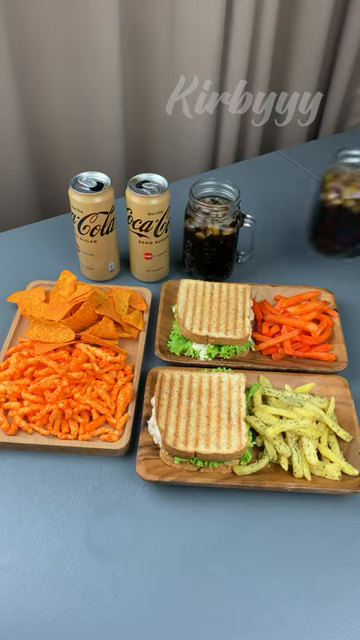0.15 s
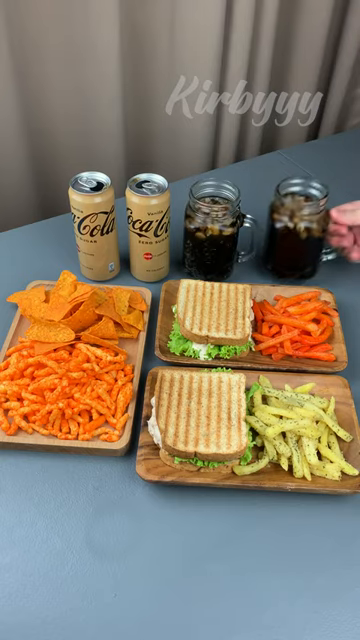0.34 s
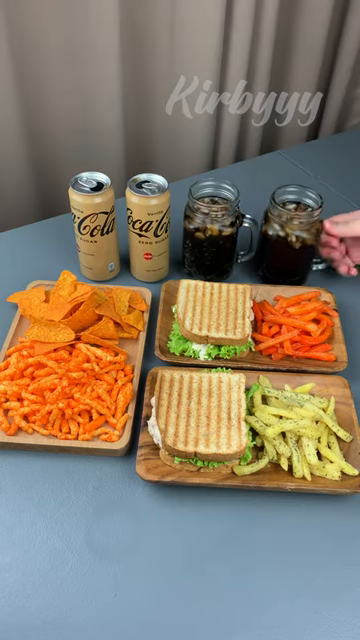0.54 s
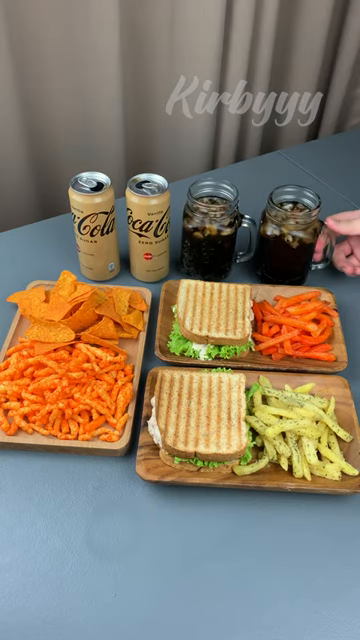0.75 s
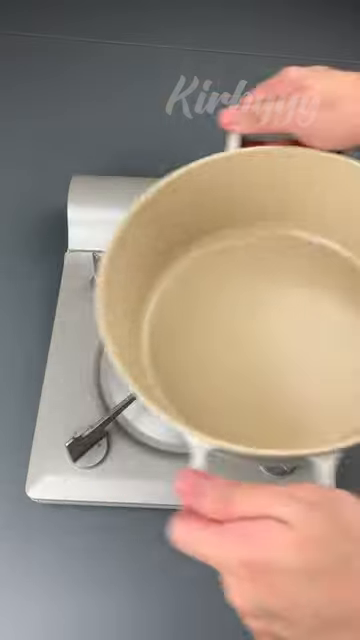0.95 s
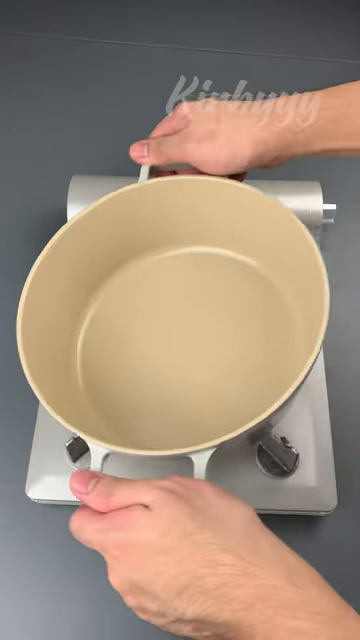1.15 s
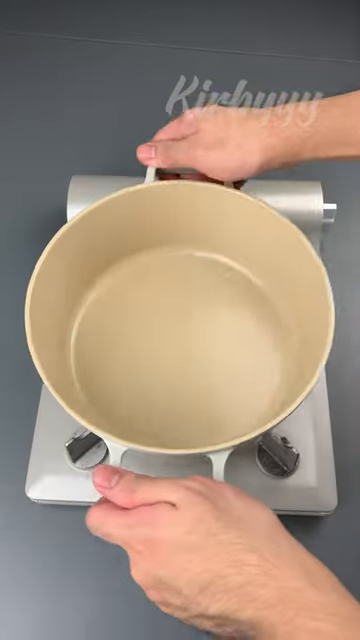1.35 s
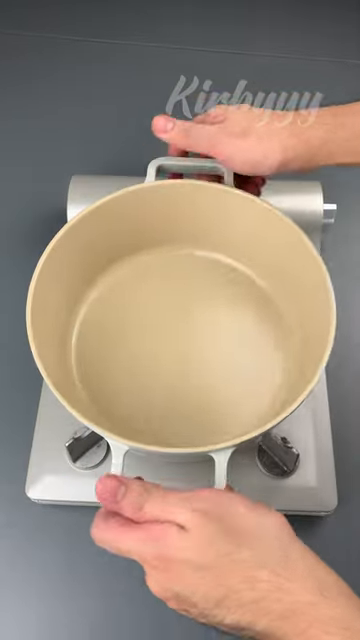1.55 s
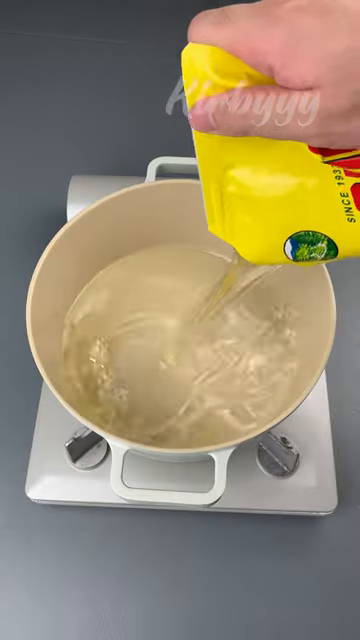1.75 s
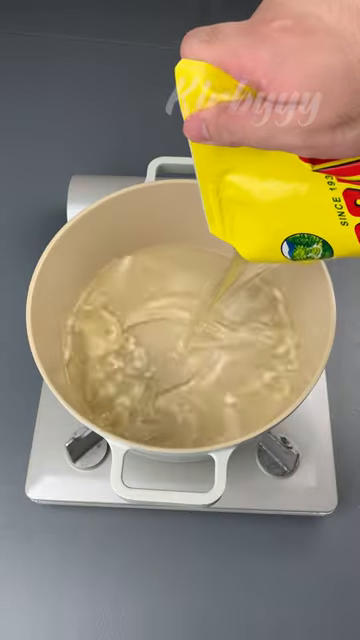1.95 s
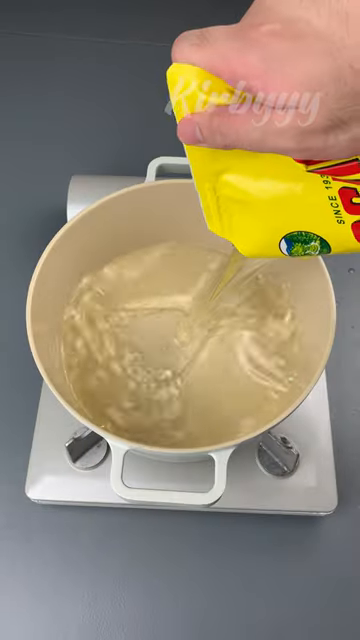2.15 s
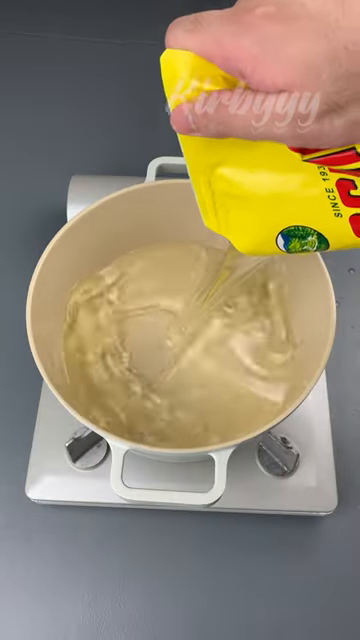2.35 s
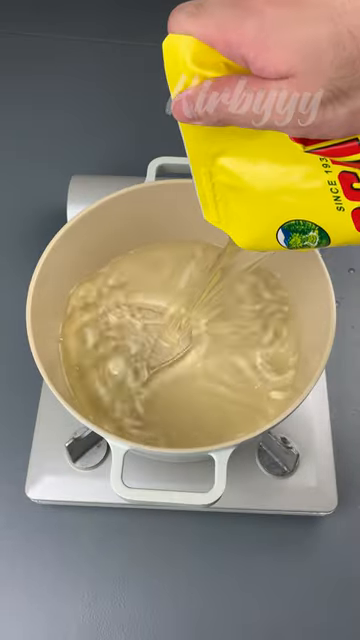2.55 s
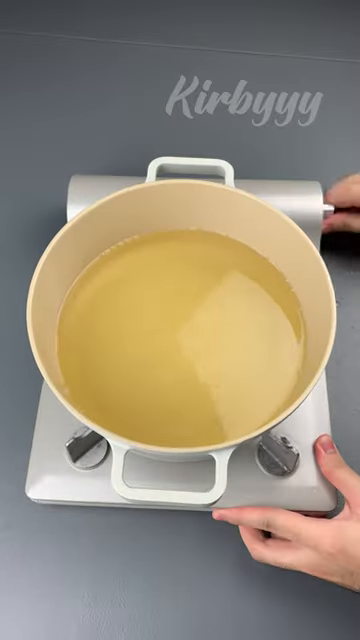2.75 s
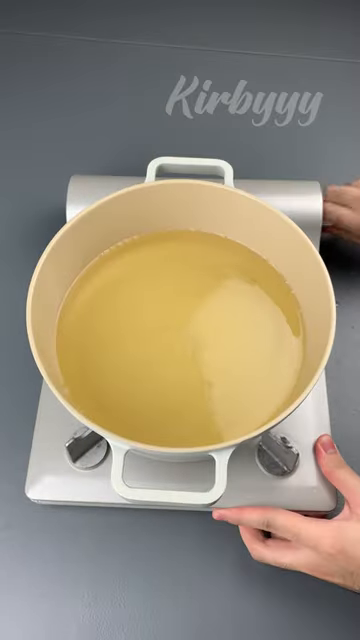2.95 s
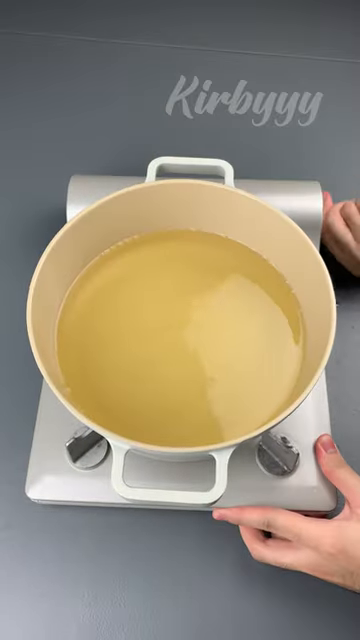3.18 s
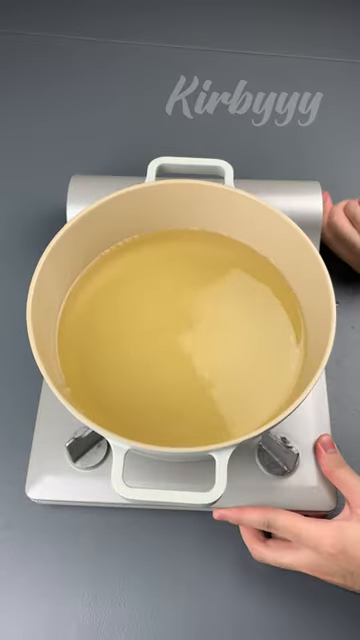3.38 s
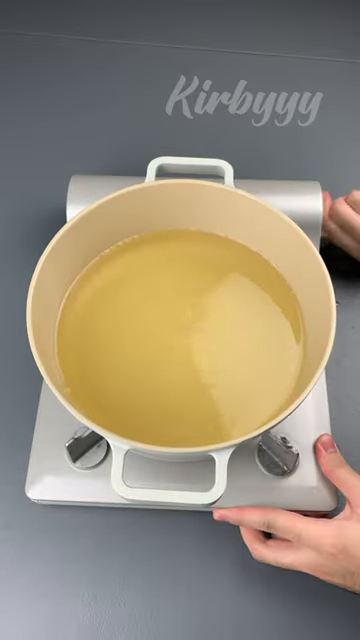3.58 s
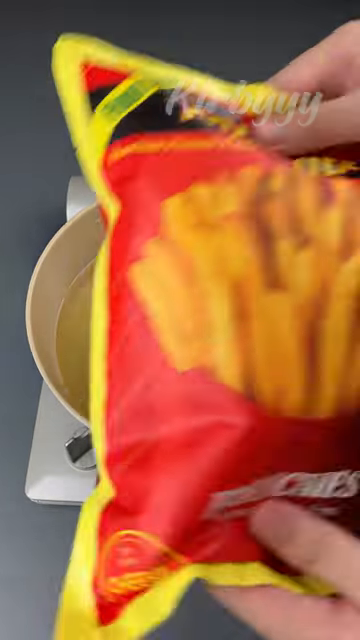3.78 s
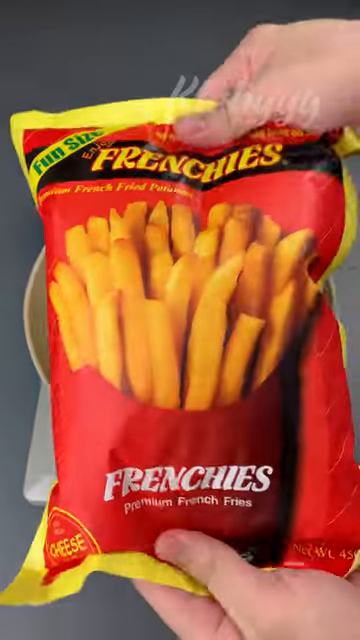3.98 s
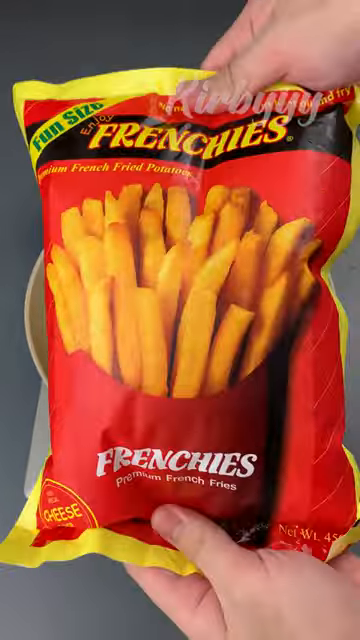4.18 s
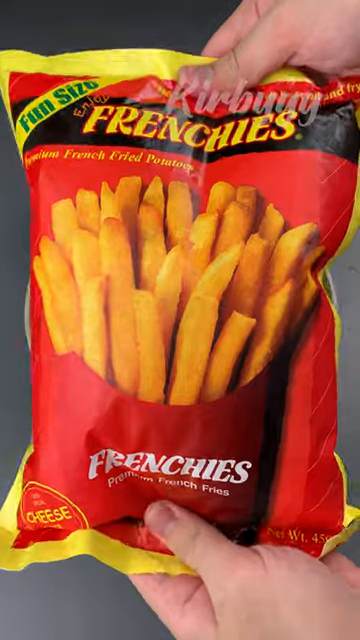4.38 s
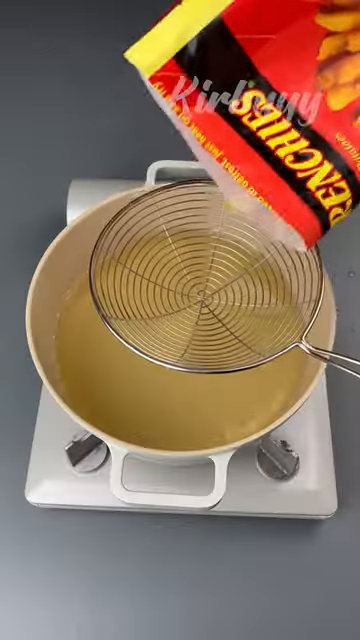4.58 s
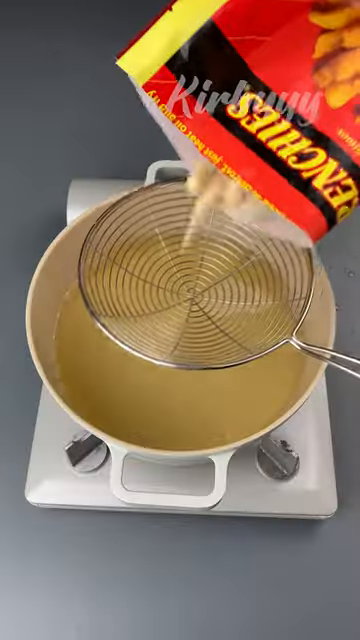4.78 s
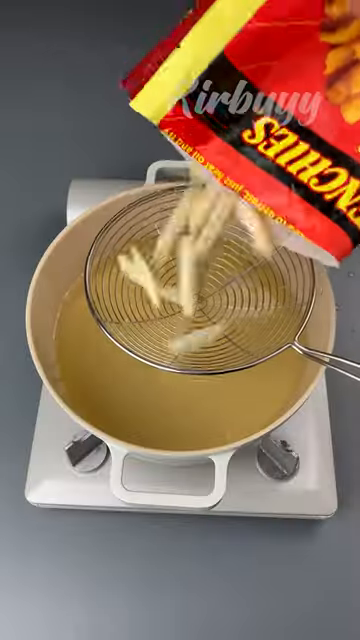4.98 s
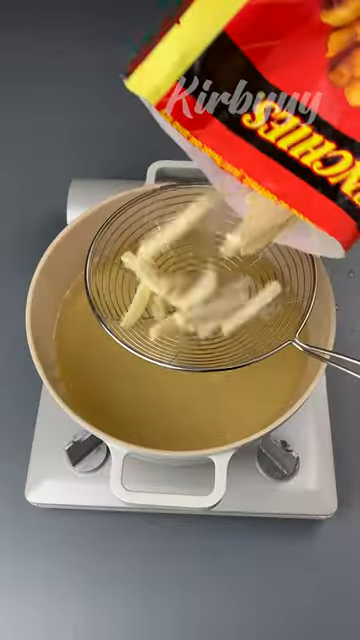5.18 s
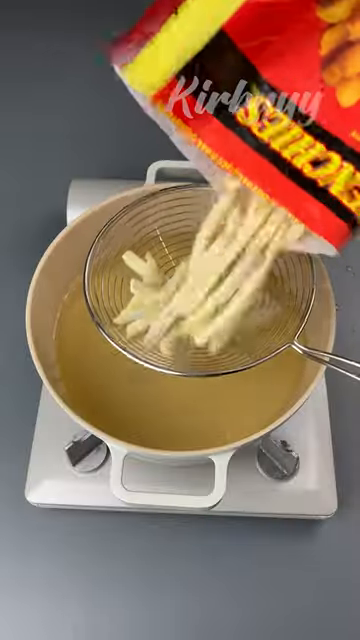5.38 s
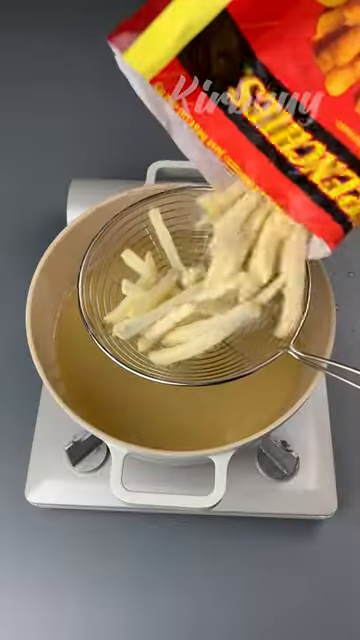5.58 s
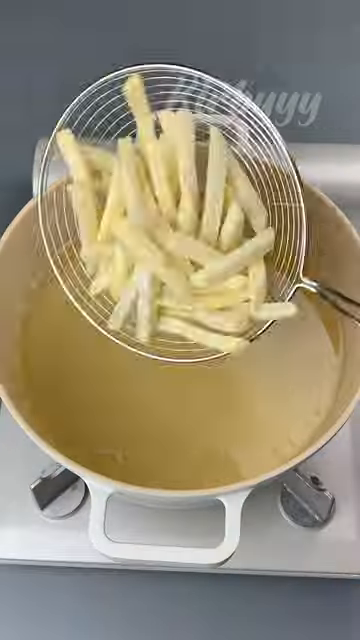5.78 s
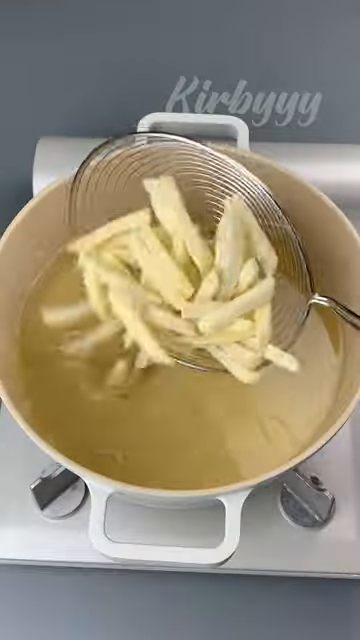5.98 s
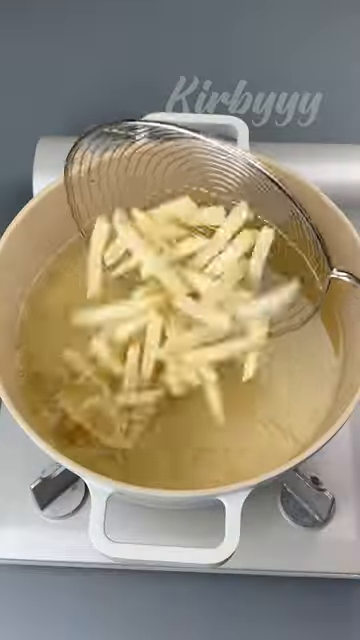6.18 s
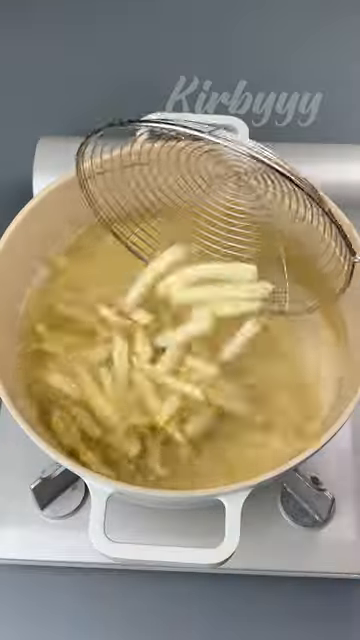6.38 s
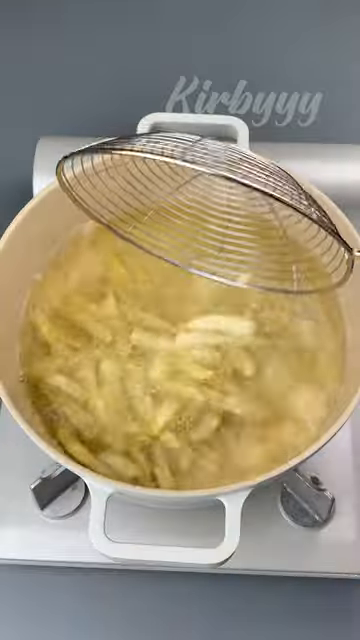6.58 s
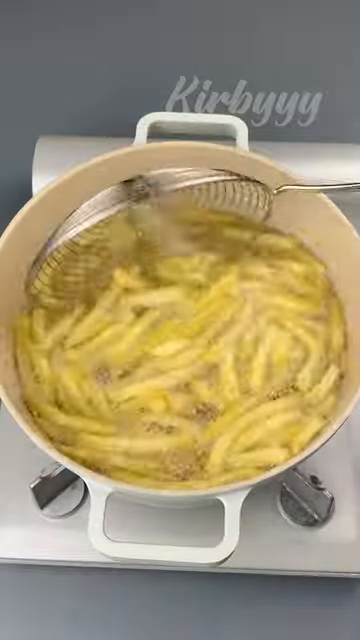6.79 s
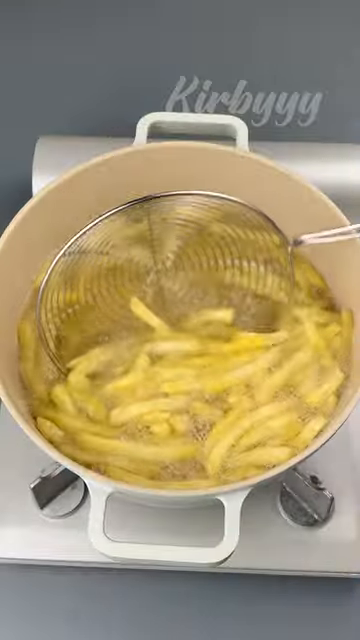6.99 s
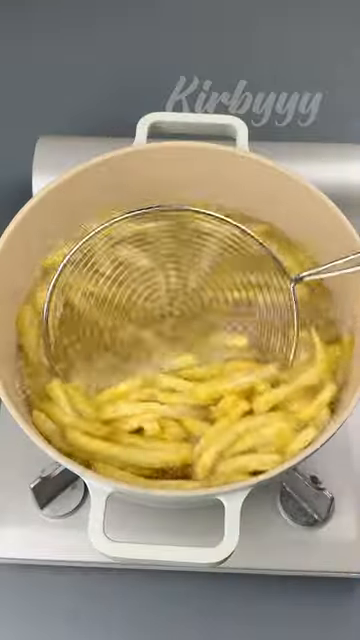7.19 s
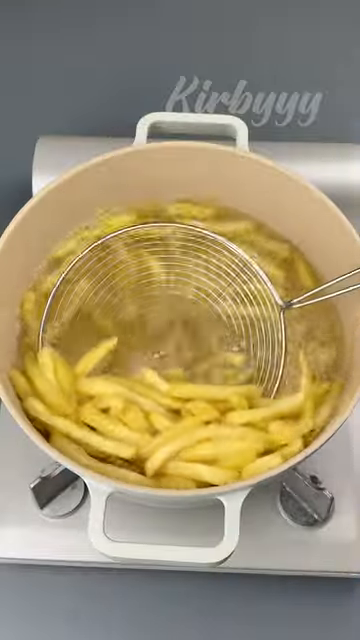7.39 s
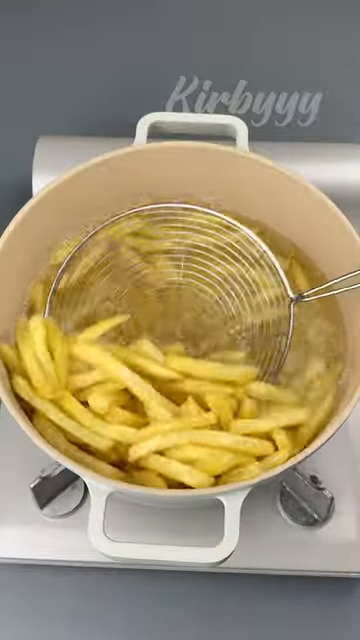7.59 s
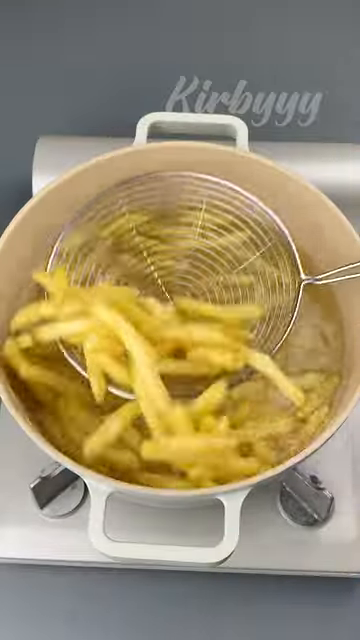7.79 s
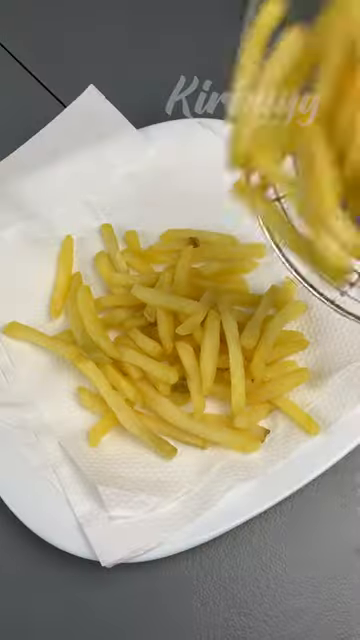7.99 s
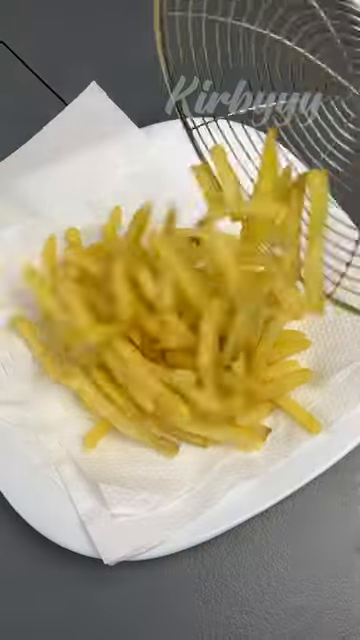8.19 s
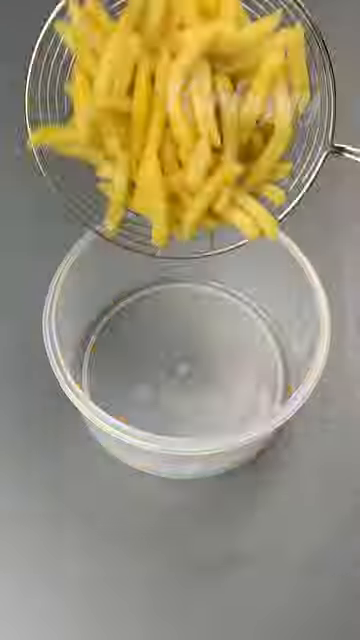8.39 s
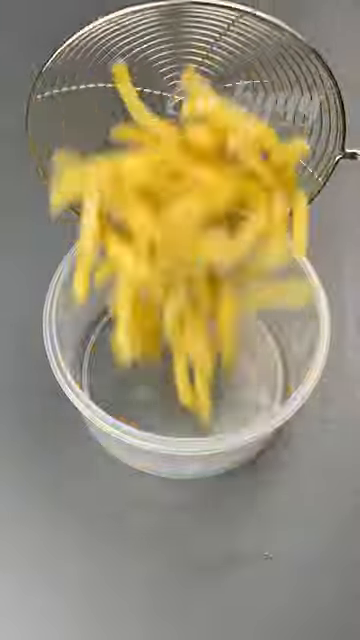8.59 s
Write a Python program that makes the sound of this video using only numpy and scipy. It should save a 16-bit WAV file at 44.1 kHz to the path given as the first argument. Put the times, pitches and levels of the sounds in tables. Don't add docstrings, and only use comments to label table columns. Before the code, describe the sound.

Close, abruptly cut cooking sounds: table knock, metal clank, splashing oil, gas burner snap, crinkling frozen bag, spilling fries, wet sizzling, plate rustle, plastic drumming.

```python
import sys
import numpy as np
from scipy import signal
from scipy.fft import rfft, irfft, next_fast_len
from scipy.io import wavfile
from scipy.ndimage import uniform_filter1d

SR = 44100
rng = np.random.default_rng(int(sys.argv[2]) if len(sys.argv) > 2 else 0)


def undo_db(level):
    steps = np.asarray(level, float) / 20
    return 10 ** steps


def generate_wav(sig):
    pcm = np.round(np.clip(np.atleast_2d(sig).T, -1, 1) * 32767).astype(np.int16)
    wavfile.write(sys.argv[1], SR, pcm)


N = 381024

CUTS = [
    0,
    .837,
    1.637,
    3.7,
    4.542,
    5.842,
    6.712,
    7.874,
    8.445,
    8.7,
]
ALIKE = [.6, .4, .5, .3, .9, 1., 1., 1., .9]

# [t/s, level/dB]
QUIET = [
    [(.2, -76), (.27, -57), (.4, -77)],
    [(.84, -87), (1.08, -93), (1.14, -54)],
]
OIL = [(1.64, -54), (1.76, -51.5), (2.0, -75), (2.24, -70), (2.32, -57), (2.55, -51.5), (2.82, -72),
       (2.95, -59), (3.16, -55)]
FLAME = [(3.21, -28), (3.3, -32), (3.5, -58), (3.698, -75.5)]
BAG = [
    [(3.7, -41), (3.76, -26), (3.95, -35.5), (4.04, -29), (4.13, -54.5), (4.22, -37), (4.28, -49.5),
     (4.4, -44.5), (4.54, -37)],
    [(4.545, -55.5), (4.59, -43.5), (4.68, -29), (4.74, -37.5), (4.88, -33.5)],
]
POUR = [(4.88, -24), (4.97, -17.5), (5.14, -23.5), (5.36, -25), (5.45, -33.5), (5.53, -23), (5.77, -33),
        (5.84, -30)]
SIZZLE = [(5.845, -55.5), (5.93, -37), (6.08, -19), (6.15, -24.5), (6.31, -17.5), (6.4, -22.5), (6.66, -25),
          (6.71, -32)]
FRY = [(6.715, -38.5), (7.872, -35)]
SLIDE = [
    [(7.876, -50), (7.98, -35), (8.12, -21.5), (8.22, -23), (8.36, -38.5), (8.443, -47)],
    [(8.447, -34), (8.5, -31.5), (8.58, -35)],
]

COLOUR_HZ = [50, 110, 250, 500, 1000, 2000, 4500, 9000, 15500]
HUM = [-7, -1.5, -13, -19.5, -14, -10, -21, -31, -28]
KNOCK = [-25, -5.5, -11.5, -7, -14, -15.5, -15, -31, -33]
CLANK = [-4, 4.5, -10, -9, -5.5, -13, -4, -19, -30.5]
SPLASH = [-14, -11, -11.5, -1.5, 5, 3, 5, -1.5, -2]
TICK = [-40, -40, -35, -30, -25, -18, -10, -4, 0]
SNAP = [-20, 4.5, -11.5, 1.5, -1, -6, -10, -17, -22]
ROAR = [-12.5, -6.5, -1, 7.5, -5, -10, -30.5, -42, -49]
FILM = [-13, -9, -7.5, -2.5, 4, -5, -2.5, -3.5, -5]
HISS = [-6, -7, -18.5, -7, -5, -10.5, -6, -2, -2]
RUSTLE = [5, 7, -5, -12, -8, -11.5, -26.5, -26.5, -28.5]
DRUM = [-21, -5.5, 6, -16.5, -11.5, -10, -13, -25, -31.5]

# [t/s, level/dB; where they vary: treble share/dB, crack length/ms]
JAR_BLOWS = [
    (0.228, -49.5, -6),
    (0.268, -48.5, -9.5),
    (0.304, -51.5, -9),
    (0.415, -0.5, -23),
    (0.427, 1, -24.5),
    (0.552, -13, -11),
]
POT_BLOWS = [
    (1.165, -1, -22, 5.8),
    (1.173, -3, -26, 8),
    (1.184, -3, -28.5, 8),
    (1.198, -7, -26, 8),
    (1.224, -15, -26, 8),
    (1.284, -16, -32.5, 8),
    (1.376, -1, -17, 10),
    (1.388, -6, -22, 10),
    (1.409, -11, -22, 10),
]
OIL_SLAPS = [(1.678, -35, 7.5), (1.721, -21, -10.5), (1.752, -23, -21.5), (1.796, -21, -16),
             (1.888, -29.5, -8), (1.927, -23, -3), (1.947, -23.5, -69), (2.022, -37, 0, 16),
             (2.054, -20.5, -37), (2.158, -37, -36), (2.277, -12, -33), (2.483, -2, -27),
             (2.573, -16.5, -6), (2.599, -16, -10), (2.659, -20, -33.5), (2.74, -25, -28.5)]
LEVER = [
    (2.896, -19.5, -11.5),
    (3.056, -17.5, -28),
    (3.177, 7, -14.5),
    (3.51, -16, -22.5),
]
CREASES = [(3.712, -8, -16), (3.7192, -2), (3.73, 0.98, -10.5), (3.7519, 3, 0), (3.7732, -2),
           (3.8126, -1.8, -17.5), (3.832, -2, -17.5), (3.8878, -4.5, -26), (3.9003, 0), (3.9377, -8),
           (3.955, -15, -6), (3.9893, 2), (4.0135, 0.98), (4.0214, 0), (4.05, -7), (4.0565, 2),
           (4.0834, -1), (4.1071, -8), (4.1663, -3.5), (4.137, -16, -14), (4.148, -16, -10),
           (4.182, -2, -14), (4.2, -6, -12), (4.2268, -3), (4.3185, -5.5), (4.289, -15, -10),
           (4.332, -7, -10), (4.409, -16, -12), (4.438, -13, -12), (4.3468, -15.5, -2.5), (4.368, -2.8),
           (4.3831, 2.5), (4.4483, -9.5, -16.5), (4.4772, -4), (4.5081, -4, 1)]
TUMBLES = [(4.5293, 5, -6), (4.6029, 1, -12), (4.651, 1.5, -8), (4.664, -4, -14, 16), (4.7002, -7, -0.5),
           (4.7584, -1.5, -12), (4.886, -14, -3.5), (4.945, -6.5, 4), (5.0482, -6, -20),
           (5.1064, -11.5, -3), (5.1723, -9, -0.5), (5.2078, -2, -15.5), (5.2924, -6, -22),
           (5.314, -5, -20), (5.3749, -5, -15), (5.3917, -4, -16), (5.409, -6, -13), (5.5174, -5, -5),
           (5.528, -5, -18)]
SPITS = [(6.0717, 2, -1.5), (6.115, -9, -15), (6.5705, -13, -14), (6.6194, -9, -5), (6.6664, -16.5, -18.5),
         (7.852, -12.5, -4.5)]
SIEVE_KNOCKS = [(6.016, -22.5), (6.061, -16), (6.116, -14.5), (6.175, -12.5), (6.224, -14), (6.262, -21),
                (6.305, -4.5), (6.339, -15.5), (6.373, -15), (6.46, -14), (6.525, -21.5)]
SIEVE_BLOW = [
    (6.861, 2.5, -18),
    (6.882, -15, -8.5),
]
PLATE_BLOW = [
    (8.296, -3, -10.0),
]
TUB_BLOWS = [
    (8.585, 11, -25.5),
    (8.613, 4.5, -37.5),
    (8.618, -6.5, -28.5),
    (8.626, 7, -14.5),
    (8.634, 8.5, -31.5),
]
# [t/s, level/dB]
OIL_TICKS = [(1.7265, -33), (1.7659, -29), (1.7828, -28), (1.8133, -32), (1.8234, -39), (1.9285, -22),
             (1.9704, -48), (2.0073, -40), (2.0268, -37), (2.0602, -24), (2.0814, -44), (2.1166, -51),
             (2.1525, -46), (2.2474, -51), (2.2568, -38), (2.3017, -45), (2.3251, -40), (2.3466, -34),
             (2.3805, -48), (2.4224, -42), (2.5336, -32)]
# [t/s, level/dB, f/Hz]
BAG_BUMPS = [(3.697, -20, 659), (3.711, -10, 810), (3.73, -8, 813), (3.78, -8, 824), (3.813, -8, 964),
             (3.867, -14, 961), (3.886, -7, 1080), (3.907, -11, 1090), (3.936, -13, 627), (3.996, -8, 1010),
             (4.019, -11, 1030), (4.049, -11, 939), (4.086, -21, 966), (4.142, -27, 1080),
             (4.148, -26, 1200), (4.182, -14, 969), (4.203, -16, 923), (4.222, -13, 1060), (4.25, -18, 918),
             (4.288, -21, 861), (4.297, -21, 630), (4.318, -18, 921), (4.345, -16, 937), (4.369, -14, 1280),
             (4.409, -23, 1090), (4.438, -17, 1200), (4.454, -15, 937), (4.478, -20, 1510),
             (4.509, -21, 958), (4.528, -20, 1310)]
POUR_BUMPS = [(4.581, -16, 1520), (4.602, -10, 458), (4.65, -13, 1260), (4.663, -10, 810),
              (4.725, -13, 1100), (4.757, -10, 1110), (4.782, -15, 851), (4.847, -22, 452),
              (4.849, -20, 1080), (4.878, -23, 1140), (4.888, -22, 856), (4.927, -22, 1100),
              (4.987, -21, 899), (5.004, -18, 999), (5.047, -12, 972), (5.107, -14, 1120),
              (5.141, -16, 1340), (5.167, -19, 988), (5.207, -12, 1160), (5.246, -19, 1170),
              (5.291, -13, 964), (5.314, -10, 482), (5.341, -17, 1100), (5.367, -15, 1150),
              (5.375, -12, 544), (5.392, -10, 1080), (5.406, -13, 1340), (5.446, -23, 1350),
              (5.471, -24, 1320), (5.497, -26, 1300), (5.51, -20, 1090), (5.528, -15, 1310),
              (5.571, -19, 544), (5.623, -18, 810), (5.643, -19, 821), (5.75, -26, 969), (5.761, -24, 942),
              (5.799, -23, 824), (5.827, -23, 1150)]
# [t/s, level/dB, f/Hz, t60/s]
PINGS = [(0.552, -32, 6820, 0.16), (1.725, -29, 2470, 0.14), (1.722, -31, 3050, .08),
         (1.74, -36, 1250, .15), (1.728, -38.5, 814, 0.34), (2.576, -13, 5350, 0.079),
         (2.603, -11, 5200, 0.053), (2.574, -19, 5750, .12), (2.574, -22, 6500, .05),
         (2.725, -36, 5700, .05), (2.745, -38, 3600, .15), (1.885, -42, 3400, .12), (4.915, -23, 2780, .5),
         (4.93, -24, 2520, .4), (5.522, -24, 2870, .2), (5.74, -30, 2850, .25), (2.777, -41, 115, .8),
         (7.031, -29, 108, 0.92)]
# [t/s, level/dB, f/Hz, t60/s, pitch rise/share]
BUBBLES = [(1.91, -45, 1300, .03, .6), (1.815, -36, 3200, .03, .06), (2.659, -17, 950, .04, .3),
           (2.739, -24, 730, .07, .04), (2.058, -36, 2100, .03, .15), (2.124, -44, 1700, .03, .1),
           (1.73, -34, 2200, .03, .2), (2.16, -46, 2200, .02, .2)]

# [f/Hz, level/dB, t60/s]
TABLE = [(57.5, -15, 1), (83.7, -6, 0.23), (115, -3, 0.4), (173.7, 1, 0.3), (227.3, -15, 0.45),
         (286.6, -18.5, 0.48), (379, -7, 0.55), (426.5, -7.5, 0.35)]
POT = [(110, -14, 2.2), (167, -19, .6), (544, -4.5, .13), (910, -11, .15), (1145, -13, .4), (1763, -4, .1),
       (1965, -17, .15), (2840, -5, .13), (3580, -10, .15), (4290, -10, .3), (4870, -12, .3),
       (5830, -7, .22), (6280, -9, .18), (7400, -16, .25)]
GRATE = [(650, -3, .1), (1300, -13, .6), (1583, -14, .6), (1770, -18, .8), (2420, -16, .6), (2920, -15, .9),
         (3300, -16, .6), (3600, -17, .8), (4300, -15, .9), (5100, -15, .6), (5500, -16, .6),
         (5900, -13, .8), (6350, -15, .6), (7350, -19, .6)]
STOVE = [(110, -14.5, 0.6), (802, 8, 0.053), (1000, 7.5, 0.019), (1214, 4, 0.08), (1790, -9.5, 0.49)]
FULL_POT = [(451, -19.5, 0.15), (559.5, -4, 0.11), (1157, -8.5, 0.17), (1260, -12, 0.068)]
SHAKEN_STOVE = [(108, -4, 0.35), (170, -16, .12), (448, -7.5, 0.068), (1167, -15, 0.25), (6500, -29, 0.11)]
PLATE = [(345, -2, .6), (775, -3, .5), (1340, -4, .4), (1900, -3, .9), (3305, -14, .15), (4070, -12, .25)]
TUB = [(272, 1, 0.043), (564, -12, 0.04), (696, -5, 0.021), (1470, -6, 0.021), (1903, -4, 0.016)]

# [f/Hz, t60/s]
KITCHEN = [(100, 0.83), (400, 0.48), (1500, 0.51), (4000, 0.34), (9000, 0.25), (16000, 0.25)]
# [f/Hz, share 0-1]
SAME = [(200, .96), (700, .5), (1500, .2), (3000, .1), (4200, .9), (16000, .9)]
# [f/Hz, angle/rad]
PORT_TURN = [(0, 0), (200, .1), (800, .7), (1300, .7), (2200, -.7), (3500, -1.2), (4800, -3.2),
             (22050, -29.3)]
# [f/Hz, level/dB]
RIGHT_PORT = [(300, -1.2), (1200, 1.5), (2500, 3), (4000, 0)]


def evened(x):
    return x / np.sqrt(np.mean(x ** 2) + 1e-20)


def smoothed(x, size):
    return uniform_filter1d(uniform_filter1d(x, size), size)


def read(points, hz):
    f, value = np.transpose(points)
    return np.interp(np.log(hz + 1), np.log(f + 1), value)


def shade(colour, hz):
    return undo_db(read(list(zip(COLOUR_HZ, colour)), hz)) * (hz < 16300)


def tinted(x, gain):
    size = next_fast_len(x.shape[-1] + 2048)
    return irfft(rfft(x, size) * gain(np.fft.rfftfreq(size, 1 / SR)), size)[..., :x.shape[-1]]


def add(mix, s, sound):
    cut = CUTS[np.searchsorted(CUTS, s, "right")]
    part = mix[round(s * SR):round(cut * SR)][:len(sound)]
    part += sound[:len(part)]


def wobble(t, beat, depth):
    slow = np.cos(2 * np.pi * (9 + 70 * beat ** 2) * t + 6 * beat)
    return 1 + depth * np.cos(2 * np.pi * (22 + 40 * beat) * t) * slow


def bed(rows, colour, grains_per_s, spread_db, share, clump_db, body_db, rumble_db, body_follow=1, rumble_follow=0):
    s, busy_db = np.transpose(rows)
    lull = busy_db - busy_db.max()
    levels = busy_db, body_db + body_follow * lull, rumble_db + rumble_follow * lull
    t = np.arange(s[0], s[-1], 1 / SR)
    hiss, draw = rng.standard_normal(len(t)), rng.random(len(t))
    size, drift = rng.exponential(1, len(t)), rng.standard_normal(len(t))
    clumps = undo_db(clump_db * evened(smoothed(drift, 400)))
    clicks = undo_db(spread_db * np.minimum(size, 4)) * (draw < grains_per_s / SR)
    grains = hiss * signal.lfilter([1], [1, -.94], clicks)
    share = np.clip(share, 0, 1)
    drive = clumps * (np.sqrt(1 - share) * hiss + np.sqrt(share) * evened(grains))
    fizz = tinted(drive, lambda hz: shade(colour, hz) / (1 + (4000 / (hz + 1)) ** 6))
    body = tinted(drive * clumps[::-1],
                  lambda hz: shade(colour, hz) / (1 + (hz / 4000) ** 6) / (1 + (300 / (hz + 1)) ** 4))
    rumble = tinted(hiss, lambda hz: shade(colour, hz) / (1 + (hz / 300) ** 4))
    layers = zip((fizz, body, rumble), levels)
    return s[0], sum(evened(x) * undo_db(np.interp(t, s, db)) for x, db in layers)


def blows(rows, colour, body=(), ring_db=0., crack_db=0., ms=8.4, throb=1.0, swell=0.44, twin=0.0062,
          spike=2.2, vary=0):
    out, clock = np.zeros(N), np.arange(SR // 2) / SR
    usual_db = np.mean([row[2] for row in rows if len(row) > 2] or [0])
    for s, db, *own in rows:
        treble_db, own_ms = (own or [usual_db])[0], own[1:]
        noise, jitter = rng.standard_normal(4096), rng.random((len(body), 2))
        since, length = clock[:4096] - .01, max((own_ms or [ms])[0], .2) / 1000
        after = np.exp(-since / length) + spike * np.exp(-9 * abs(since) / length)
        before = swell * np.exp(np.minimum(since, 0) / (.45 * length))
        shape = np.where(since > 0, after, before)
        slope = np.clip(treble_db - usual_db, -18, 18) / 1.9
        crack = tinted(noise * shape, lambda hz: shade(colour, hz) * undo_db(slope * np.log2((hz + 200) / 2000)))
        add(out, s - .01, undo_db(db + crack_db) * crack / abs(crack).max())
        for (hz, mode_db, t60), (louder, beat) in zip(body, jitter):
            t, hz = clock[clock < 2 * t60], hz * (1 + vary * (beat - louder))
            splits = 0, 1 + beat, -1 - 2 * louder
            trio = sum(np.sin(2 * np.pi * hz * (1 + twin * off) * t) for off in splits) / 2
            ring = trio * undo_db(db + ring_db + mode_db + 4 * (louder - .5) - 60 * t / t60)
            ring = ring * wobble(t, beat, throb * (hz > 300))
            add(out, s + 0.0021 * beat, ring * np.minimum(t * hz, 1) * np.linspace(1, 0, len(t)))
    return out


def bumps(rows, t60, level_db, pair_db):
    out, t = np.zeros(N), np.arange(2600) / SR
    for (s, db, hz), (longer, above) in zip(rows, rng.random((len(rows), 2))):
        turns = hz * (t - 1.5 * t ** 2)
        tone = np.sin(2 * np.pi * turns) + undo_db(pair_db) * np.sin(2 * np.pi * turns * (1.4 + above))
        fade_db = 60 * t / (t60 * (.7 + .6 * longer))
        add(out, s, tone * undo_db(db + level_db - fade_db) * np.minimum(t / .0025, 1))
    return out


def echoes(alike):
    taps = np.zeros((2, SR // 2))
    at = np.arange(120, SR // 2 - 20, 20) + rng.integers(0, 20, (2, (SR // 2 - 121) // 20))
    np.put_along_axis(taps, at, rng.choice([-1., 1.], at.shape), 1)
    hz, t, z = signal.stft(taps, SR, nperseg=256)
    same = np.clip(np.where(hz > 1000, alike, 1) * read(SAME, hz), 0, 1)[:, None]
    z = np.array([z[0], same * z[0] + np.sqrt(1 - same ** 2) * z[1]])
    tail = signal.istft(z * undo_db(-60 * t / read(KITCHEN, hz)[:, None]), SR, nperseg=256)[1]
    return tail / np.linalg.norm(tail[0])


def kitchen_hum():
    hum = bed([(0, -68.5), (2.9, -70.5)], HUM, 50, 3., .02, 1.5, -82, -57)[1]
    return np.resize(hum, N)


def jar(beds):
    add(beds, *bed(QUIET[0], HUM, 100, 3., .1, 2.5, body_db=-49.5, rumble_db=-69.5, body_follow=1.1))
    return blows(JAR_BLOWS, KNOCK, TABLE, ring_db=-12.0, crack_db=1.5, ms=10.5, swell=.05, twin=0.0285)


def pot(beds):
    add(beds, *bed(QUIET[1], HUM, 100, 3., .05, 1.5, body_db=-56.5, rumble_db=-42.5, body_follow=.4))
    clank = blows(POT_BLOWS, CLANK, POT, ring_db=-9, crack_db=3, twin=0.006, spike=1.1)
    return clank + blows(POT_BLOWS[::6], CLANK, GRATE, ring_db=-7, crack_db=-20, throb=.5, twin=.005)


def pings_and_bubbles():
    out, t = np.zeros(N), np.arange(SR // 3) / SR
    for s, db, hz, t60, *climb in PINGS + BUBBLES:
        rise = sum(climb)
        turns = np.cumsum(hz * (1 + rise * np.minimum(t / .025, 1))) / SR
        held = np.maximum(t - .065 * rise, 0)
        waver = .6 * evened(smoothed(rng.standard_normal(len(t)), 60))
        tone = np.sin(2 * np.pi * turns + waver) * wobble(t, rng.random(), .5)
        fade = undo_db(db - 60 * held / t60) * np.linspace(1, 0, len(t))
        add(out, s, tone * fade * np.minimum(t * hz / 2, 1))
    return out


def oil(beds):
    add(beds, *bed(OIL, SPLASH, 300, 4., 0.45, 3.5, body_db=-46.5, rumble_db=-55.5, body_follow=.7))
    slaps = blows(OIL_SLAPS, SPLASH, ms=8.0, crack_db=-2, spike=.9)
    return slaps + blows(OIL_TICKS, TICK, crack_db=1, ms=1.5, swell=.2)


def burner(beds):
    add(beds, *bed(FLAME, ROAR, 600, 4.4, 0.13, 6.9, body_db=-32.5, rumble_db=-28, body_follow=0.33))
    return blows(LEVER, SNAP, STOVE, ring_db=-26.5, spike=1.4, ms=20.5)


def bag(beds):
    for rows in BAG:
        add(beds, *bed(rows, FILM, 700, 4., .6, 2.5, body_db=-22, rumble_db=-22.5,
                       body_follow=0.75, rumble_follow=0.99))
    creases = blows(CREASES, FILM, crack_db=-0.5, ms=4.0, swell=0.08, spike=1.4)
    return creases + bumps(BAG_BUMPS, .028, level_db=0, pair_db=-8)


def pour(beds):
    add(beds, *bed(POUR, FILM, 1200, 3.9, 0.2, 1.5, body_db=-24, rumble_db=-34.5, body_follow=.55))
    tumbles = blows(TUMBLES, FILM, FULL_POT[1:], ring_db=-20, crack_db=-6, twin=.04, spike=1.1)
    return tumbles + bumps(POUR_BUMPS, .03, level_db=-1.5, pair_db=-8)


def plate(beds):
    add(beds, *bed(SLIDE[0], RUSTLE, 1200, 3.3, 0.21, 2.2, body_db=-35.5, rumble_db=-25.5,
                   body_follow=0.66, rumble_follow=0.36))
    return blows(PLATE_BLOW, CLANK, PLATE, ring_db=-28.0, crack_db=0.0, throb=0.14, twin=0.00094)


def tub(beds):
    add(beds, *bed(SLIDE[1], RUSTLE, 1200, 4., .35, 2., body_db=-46.5, rumble_db=-45.5))
    return blows(TUB_BLOWS, DRUM, TUB, ring_db=-9.5, crack_db=-10.0)


def sieve_blow():
    return blows(SIEVE_BLOW, HISS, SHAKEN_STOVE, ring_db=-17, crack_db=-3, twin=.012)


def frying(beds):
    add(beds, *bed(SIZZLE, HISS, 1500, 3.1, 0.27, 2.1, body_db=-24, rumble_db=-42, body_follow=1.26))
    add(beds, *bed(FRY, HISS, 1500, 3.1, 0.33, 0.4, body_db=-43, rumble_db=-39.5))
    spits = blows(SPITS, HISS, crack_db=1.0, ms=0.99)
    return spits + blows(SIEVE_KNOCKS, HISS, FULL_POT, ring_db=-8.5, throb=0.45, twin=.008, vary=.04)


def scene():
    beds = kitchen_hum()
    sources = [(jar(beds), -5.5), (pot(beds), -7.5), (oil(beds), -10.5), (pings_and_bubbles(), -16.5),
               (burner(beds), -6.0), (bag(beds), -17.0), (pour(beds), -9.5), (frying(beds), -5.5),
               (sieve_blow(), -3.0), (plate(beds), -6.5), (tub(beds), -5.0)]
    close = sum(sound for sound, _ in sources)
    out = np.zeros((2, N))
    for start, end, alike in zip(CUTS, CUTS[1:], ALIKE):
        shot = slice(round(start * SR), min(round(end * SR), N))
        near = close[shot] + 0.66 * beds[shot]
        far = sum(undo_db(db) * sound[shot] for sound, db in sources) + 0.36 * beds[shot]
        out[:, shot] = near + signal.fftconvolve(far[None], echoes(alike), axes=1)[:, :len(near)]
    return out


def thinned(pair, under_db, flicker_db):
    z = signal.stft(np.array([pair[0] + pair[1], pair[0] - pair[1]]) / 2, nperseg=2048)[2]
    power = np.add.reduceat(abs(z) ** 2, np.arange(0, 1025, 12), axis=1)
    power = np.repeat(power, 12, axis=1)[:, :1025]
    limit_db = under_db + flicker_db * rng.standard_normal((2, 1, z.shape[2]))
    weak = power < power[::-1] * undo_db(2 * limit_db)
    weak[:, :140] = False
    loudness = power.sum((0, 1))
    weak &= loudness < 3.4 * np.roll(loudness, 1)
    total, diff = signal.istft(z * ~weak, nperseg=2048)[1][:, :N]
    return np.array([total + diff, total - diff])


def low_pass(x):
    return signal.sosfilt(signal.butter(12, 16420, fs=SR, output="sos"), x)


def record(dry):
    hz = np.arange(0, SR // 2 + 1, 10)
    turn = np.interp(hz, *np.transpose(PORT_TURN))
    right = tinted(dry[1], lambda f: undo_db(read(RIGHT_PORT, f)) * np.exp(1j * np.interp(f, hz, turn)))
    pair = tinted(np.array([dry[0], right]), lambda f: 1 / np.sqrt(1 + (55 / (f + 1)) ** 6))
    mix = np.clip(thinned(pair, under_db=-8.5, flicker_db=1.6), -1, 1)
    return low_pass(mix)


dry = scene()
out = record(dry)
generate_wav(out)
```